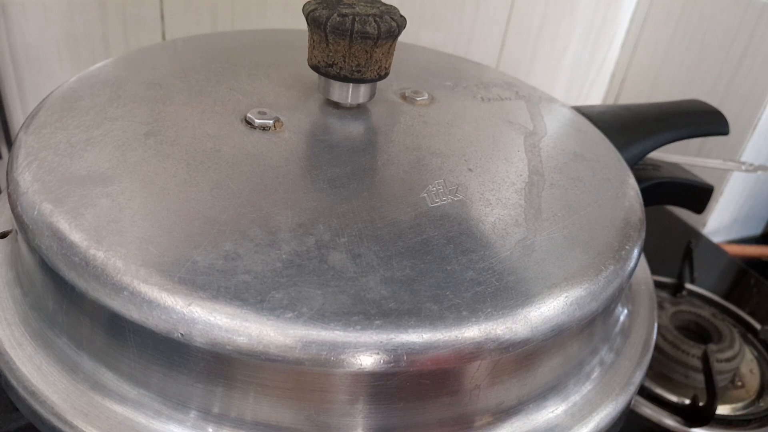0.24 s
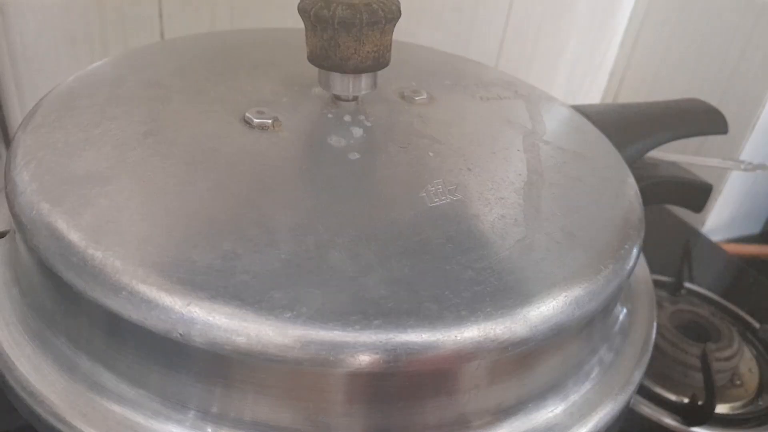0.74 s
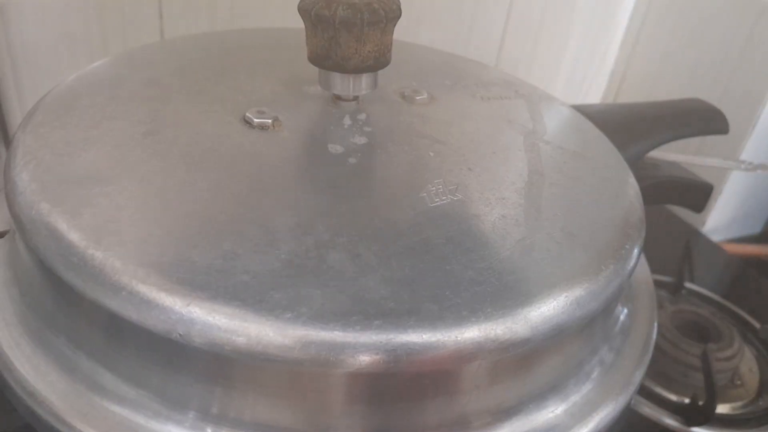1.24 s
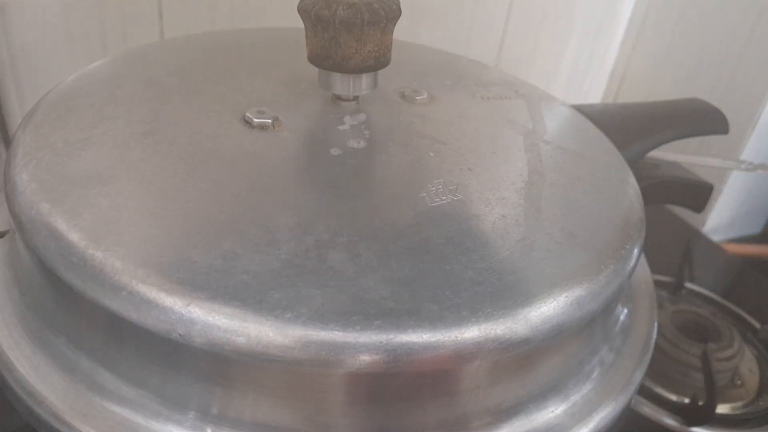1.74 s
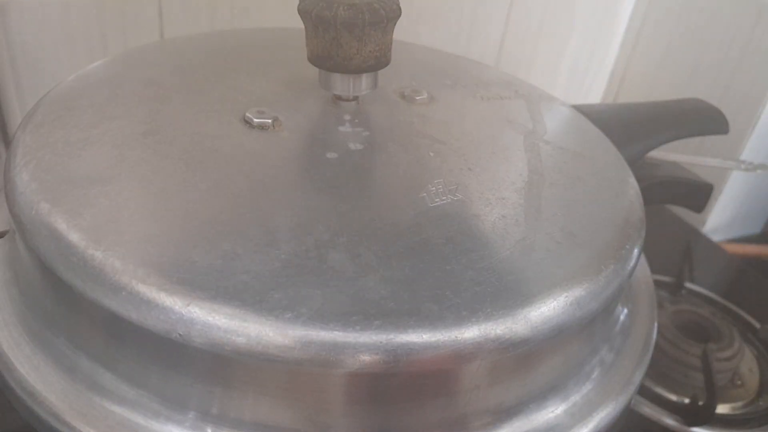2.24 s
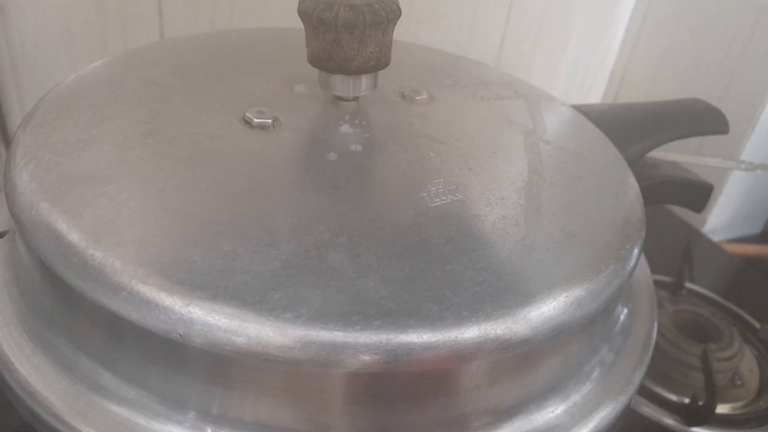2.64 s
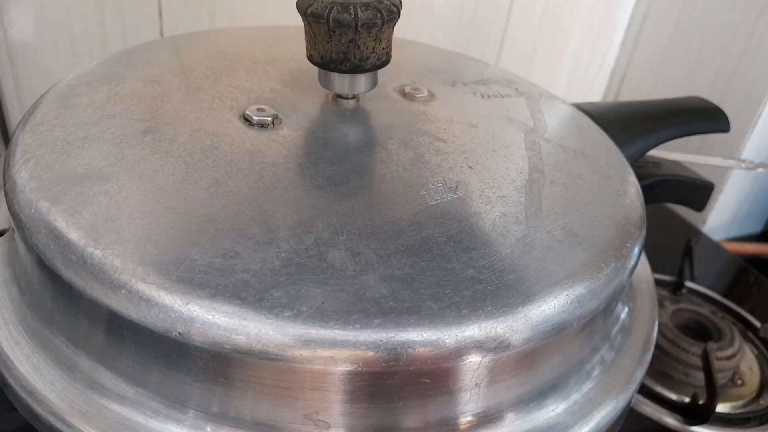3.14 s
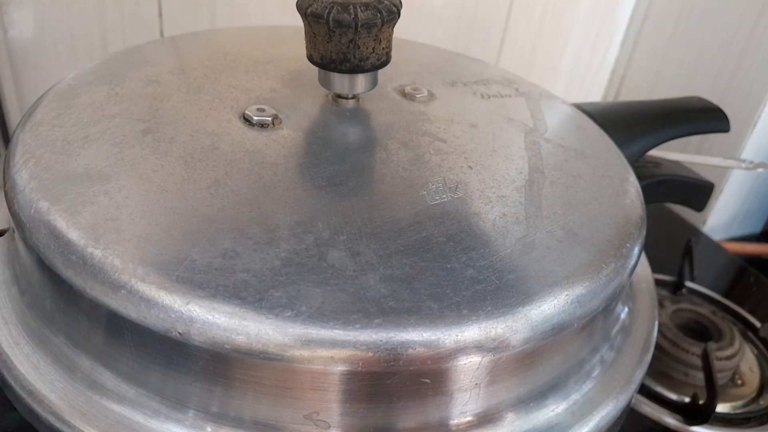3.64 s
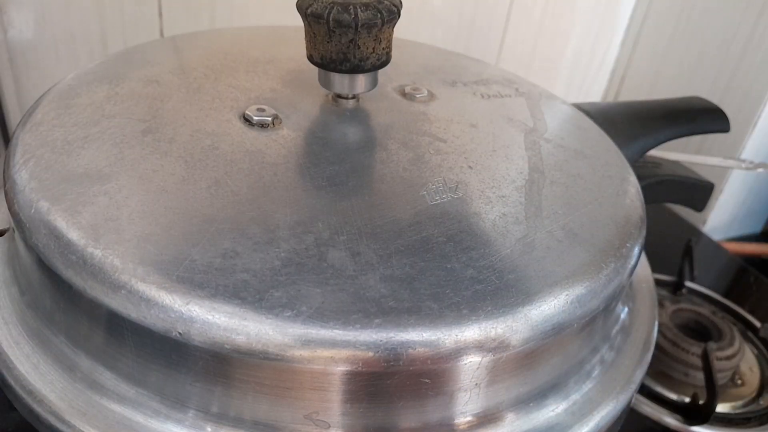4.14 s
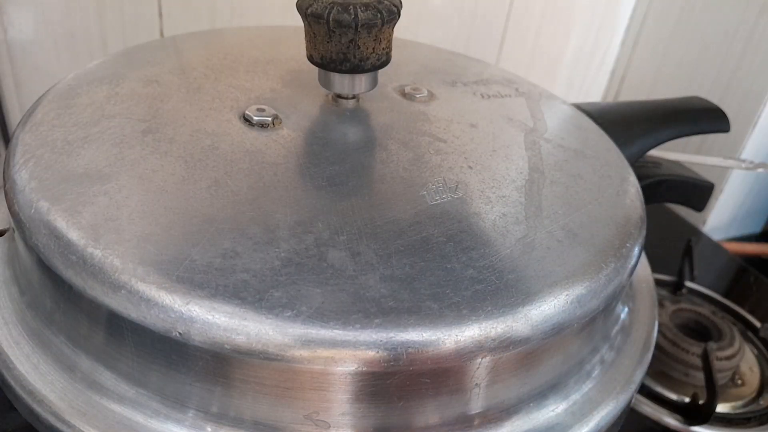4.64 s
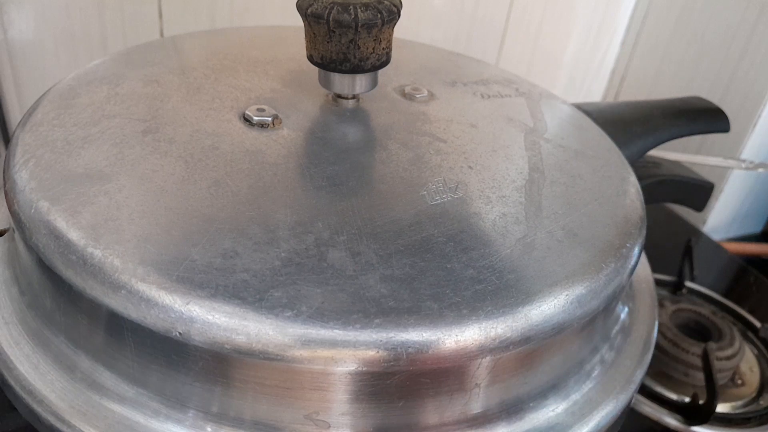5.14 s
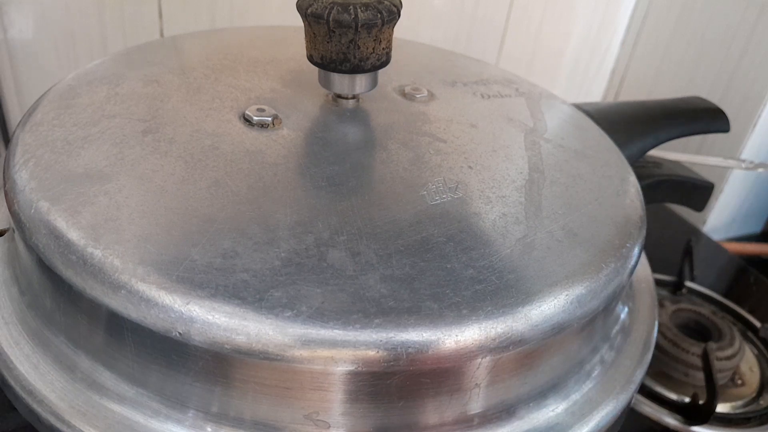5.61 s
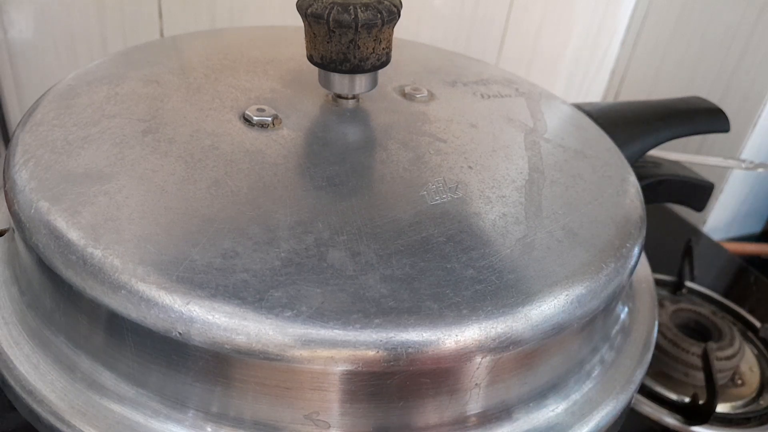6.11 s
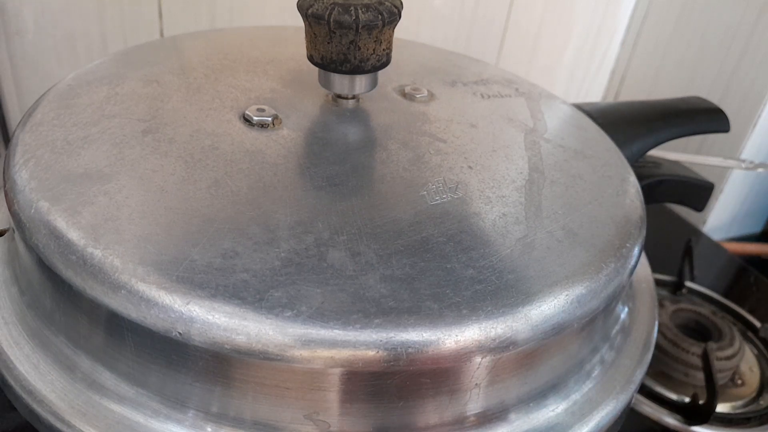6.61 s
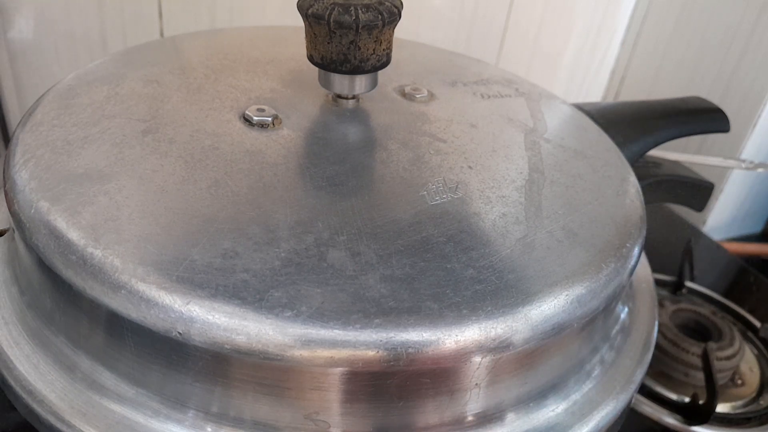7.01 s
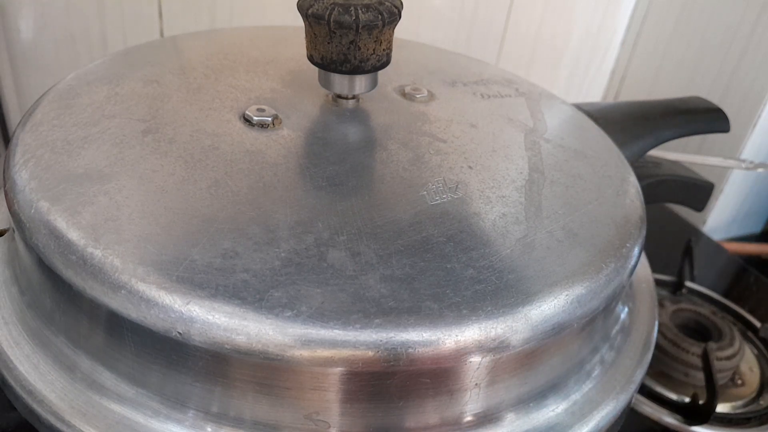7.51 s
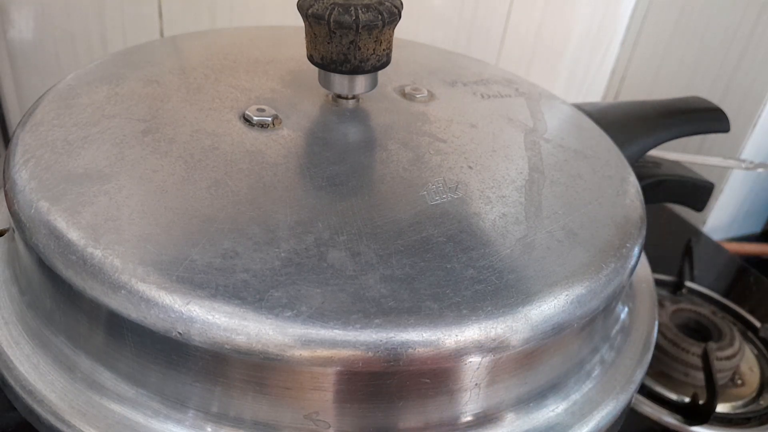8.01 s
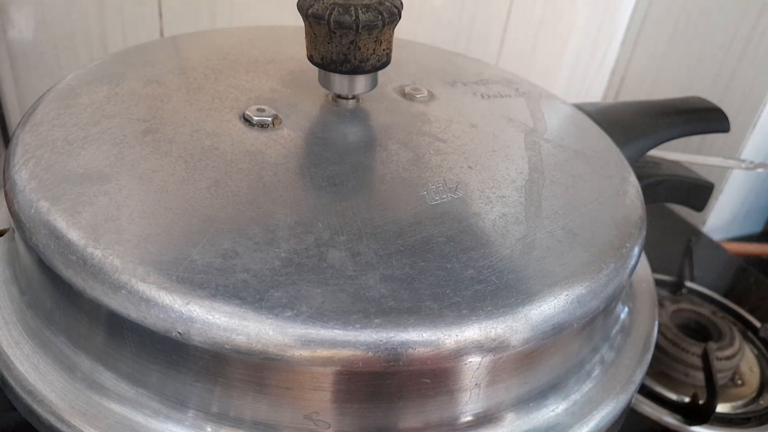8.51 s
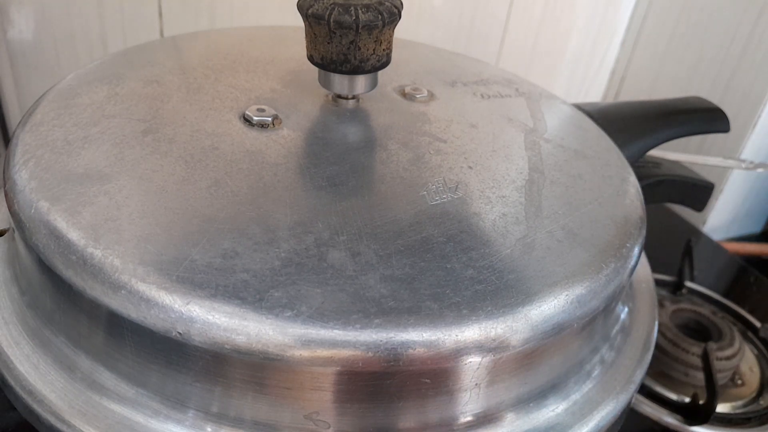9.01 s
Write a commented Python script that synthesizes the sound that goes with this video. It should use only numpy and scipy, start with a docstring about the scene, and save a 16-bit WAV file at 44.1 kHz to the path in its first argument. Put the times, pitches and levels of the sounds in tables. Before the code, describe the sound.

A quiet kitchen with a low rumble and a faint distant tone cuts out for an instant. Then a pressure cooker blasts a loud, bright hiss of steam past its weight valve, close to the microphone. The draught buffets the microphone and the hiss takes on a sweeping, hollow colour. After another brief dropout, the hiss carries on steadily, a little calmer, with two tiny spits.

```python
"""Pressure cooker in a tiled kitchen

A quiet room with a low rumble and a distant tone is heard at two microphone ports. The sound drops out;
then a turbulent jet of steam roars past the weight valve, excites its resonances and buffets the ports,
while the echo off a hand nearing the right port sweeps a comb filter through the hiss.
After a second dropout the jet hisses on, a little calmer, and spits two droplets."""
import sys
import numpy as np
from scipy import signal
from scipy.fft import rfft, irfft, next_fast_len
from scipy.io import wavfile
from scipy.ndimage import uniform_filter1d, map_coordinates

SR = 44100
rng = np.random.default_rng(int(sys.argv[2]) if len(sys.argv) > 2 else 0)


def output_pcm(signal):
    """Save a mono or channel-first signal as 16-bit PCM at the path in sys.argv[1].

    Samples are clipped to [-1, 1] before scaling.
    """
    pcm = np.clip(np.atleast_2d(signal).T, -1, 1) * 32767
    wavfile.write(sys.argv[1], SR, np.round(pcm).astype(np.int16))


N = 408366
TIME = np.arange(N) / SR
STEAM_START_S, SECOND_BURST_S = .65, 3  # each falls inside a dropout
FIRST_BURST = TIME < SECOND_BURST_S


def amp(db):
    """Amplitude ratio of a level in decibels."""
    return 10 ** (np.asarray(db) / 20)


def unit(x):
    """Normalisation of each channel to an rms of 1."""
    return x / np.sqrt(np.mean(x ** 2, axis=-1, keepdims=True))


def ramp(start_s, length_s):
    """Linear rise from 0 to 1."""
    return np.clip((TIME - start_s) / length_s, 0, 1)


def over_frequency(rows, hz):
    """Interpolation of each column after the first on a logarithmic frequency axis."""
    knots_hz, *columns = np.transpose(rows)
    return np.array([np.interp(np.log(hz + 1), np.log(knots_hz + 1), c) for c in columns])


def over_time(rows):
    """Linear interpolation of each column after the first, one value a sample."""
    knots_s, *columns = np.transpose(rows)
    return np.array([np.interp(TIME, knots_s, c) for c in columns])


def wobble(rate):
    """Smooth random modulation: a spline through `rate` Gaussian knots a second."""
    return map_coordinates(rng.standard_normal(int(N * rate / SR) + 4), [TIME * rate])


def filtered(x, response):
    """Linear filtering: the spectrum is multiplied by a complex frequency response."""
    size = next_fast_len(N + 8192)
    return irfft(rfft(x, size) * response(np.fft.rfftfreq(size, 1 / SR)), size)[..., :N]


def port_pair(noises, coherence, left_lead):
    """Partial coherence: independent noises mix as mid and side, then part in phase."""
    angle = lambda hz: np.arccos(np.clip(coherence(hz), 0, 1)) / 2
    mid, side = filtered(noises, lambda hz: np.array([np.cos(angle(hz)), np.sin(angle(hz))]))
    pair = np.array([mid + side, mid - side])
    return filtered(pair, lambda hz: np.exp(.5j * np.outer([1, -1], left_lead(hz))))


# Flicker of the hiss. Each row: frequency in Hz, standard deviation of the gain in dB.
FLICKER_DEPTH = [(1000, 1), (3000, 1.7), (5500, 1.2), (7500, 2), (9500, 3.6), (12000, 2.6), (16000, 3)]

def flickering_noise():
    """Random modulation: two noises flicker together in time and frequency, deepest in the treble."""
    hz, _, spectra = signal.stft(rng.standard_normal((2, N)), SR, nperseg=512)
    patches = uniform_filter1d(rng.standard_normal(spectra.shape[1:]), size=3, axis=0)
    patches = uniform_filter1d(patches, size=8, axis=1)
    gain = amp(over_frequency(FLICKER_DEPTH, hz).T * patches / patches.std())
    return signal.istft(spectra * unit(gain), nperseg=512)[1][:, :N]


# Spectrum of the quiet kitchen. Each row: frequency in Hz, relative level in dB.
ROOM_SPECTRUM = [(20, -20), (55, 1), (100, 0), (125, -11), (242, -15), (296, -9.5), (340, -14), (408, -16),
                 (1090, -19), (1330, -14), (1470, -17), (1750, -16), (2100, -24), (2740, -23), (4000, -21),
                 (5100, -21.5), (6500, -15.5), (8600, -23), (9510, -24), (15700, -22)]
# Room noise at the two ports. Each row: frequency in Hz, coherence from 0 to 1.
ROOM_COHERENCE = [(130, 0.7), (300, 0.86), (640, 0.34), (1500, .05), (6800, .2), (15000, 0.59)]

def room_noise(level_db=-43.5):
    """Ambient noise, strongest and most coherent in the bass."""
    air = port_pair(flickering_noise(), lambda hz: over_frequency(ROOM_COHERENCE, hz)[0], np.zeros_like)
    return amp(level_db) * unit(filtered(air, lambda hz: amp(over_frequency(ROOM_SPECTRUM, hz))))


# Chance swells of the low rumble. Each row: time in seconds, rms level in dB averaged over the ports.
RUMBLE_SWELLS = [(0.0, -34), (0.066, -46), (0.116, -31), (0.136, -53), (0.162, -33), (0.202, -61),
                 (0.264, -41), (0.298, -57), (0.37, -39), (0.404, -62), (0.43, -45), (0.472, -37),
                 (0.516, -50), (0.536, -46), (0.56, -46)]
# Pitch wander of the low rumble. Each row: time in seconds, frequency in Hz.
RUMBLE_WANDER = [(0, 84), (.11, 82), (.15, 95), (.36, 94.3), (.43, 87.7), (.57, 74)]

def room_rumble():
    """A narrow-band rumble near 80 Hz, formed as a carrier with irregular swells and wandering pitch."""
    level_db = uniform_filter1d(over_time(RUMBLE_SWELLS)[0], size=SR // 90)
    hz = over_time(RUMBLE_WANDER)[0] + 2 * wobble(20)
    wave = np.sqrt(2) * np.sin(2 * np.pi * np.cumsum(hz) / SR)
    return amp(level_db) * wave * amp([[1.2], [-1.2]])


def distant_whistle(stop_s=.12, drop_s=.3, drop_hz=74.4, sink_hz_per_s=150, afterglow_t60_s=1.2):
    """A tone swells and stops; its afterglow decays exponentially, steps down in pitch, then sinks."""
    stopped = ramp(stop_s, .03)
    hz = 1385 - 12 * stopped - drop_hz * ramp(drop_s, .027)
    hz -= sink_hz_per_s * np.maximum(TIME - drop_s, 0)
    held = amp(-39.5 + 2.5 * ramp(0, .09)) * (1 - stopped)
    afterglow = amp(-44.5 - 60 * (TIME - stop_s) / afterglow_t60_s) * ramp(stop_s, .12)
    flicker = amp([1.3 * wobble(40), 1.2 * wobble(40) - 4])
    phase = 2 * np.pi * np.cumsum(hz) / SR
    return (held + afterglow) * flicker * np.sin(phase + [[0], [1.5]])


def faint_whine(hz=1695):
    """A single spectral line under random amplitude modulation."""
    return amp(-74 + 4 * wobble(30)) * np.sin(2 * np.pi * hz * TIME)


def rumble_under_steam(centre_hz=80, width_hz=28):
    """Narrow-band noise, coherent at both ports, carries the room's rumble on."""
    band = filtered(rng.standard_normal(N), lambda hz: np.exp(-((hz - centre_hz) / width_hz) ** 2))
    return amp([[-53], [-55]]) * unit(band)


# Spectrum of the buffeting. Each row: frequency in Hz, relative level in dB.
BUFFET_SPECTRUM = [(20, -32), (40, -8), (70, 0), (200, -4.5), (600, -7.5), (1300, -13.5), (2500, -17),
                   (6000, -18)]
# Draught as each burst of steam begins. Each row: left level in dB, right level in dB.
DRAUGHT_LEVELS = [(-38, -37), (-36, -39)]
# Gusts on the right port. Each row: start in seconds, length in seconds, right and left gain in dB.
PORT_GUSTS = [(1.977, 0.071, 9, 0), (2.257, 0.62, 13, -5.5)]

def draught(sag_db_per_s=.68, gust_edge_s=.12, left_edge_s=.32, gust_sag_db_per_s=.3):
    """Eddies thump each port independently; gusts rise, ease and fall, and the second burst sags."""
    first_db, second_db = np.array(DRAUGHT_LEVELS)[:, :, None]
    level_db = np.where(FIRST_BURST, first_db, second_db - sag_db_per_s * (TIME - SECOND_BURST_S))
    for start, length, right_db, left_db in PORT_GUSTS:
        left = left_db * ramp(start, min(length, left_edge_s))
        right = right_db * ramp(start, gust_edge_s)
        right -= gust_sag_db_per_s * np.maximum(TIME - start - .25, 0)
        release = (1 - ramp(start + length, gust_edge_s)) * FIRST_BURST
        level_db += release * np.array([left, right])
    lumps = amp([.36 * wobble(15) + 2.73 * wobble(250) for port in "LR"])
    eddies = lumps * rng.standard_normal((2, N))
    buffeting = filtered(eddies, lambda hz: amp(over_frequency(BUFFET_SPECTRUM, hz)))
    return amp(level_db) * unit(buffeting)


def tile_reverberation(x, level_db=-18, t60_s=.08):
    """Dense, exponentially decaying reflections add a fine, steady ripple to each port's spectrum."""
    t = np.arange(SR // 8) / SR
    tail = rng.standard_normal((2, len(t))) * amp(-60 * t / t60_s) * (t > .003)
    tail /= np.linalg.norm(tail, axis=1, keepdims=True)
    return x + amp(level_db) * signal.fftconvolve(x, tail, axes=1)[:, :N]


# Echoes off tiles and lid. Each row: delay in milliseconds, left and right gain in dB.
NEAR_ECHOES = [(1.08, -26, -28), (2.0, -29, -25), (3.7, -23, -32), (4.84, -28, -32)]

def early_reflections(x, cutoff_hz=9000):
    """Interference with weak, dull, delayed copies ripples the spectrum."""
    delay_ms, *gain_db = np.transpose(NEAR_ECHOES)
    echoes = lambda hz: amp(gain_db) @ np.exp(-2j * np.pi * np.outer(delay_ms / 1000, hz))
    return filtered(x, lambda hz: 1 + echoes(hz) / (1 + (hz / cutoff_hz) ** 4))


# The hand nearing the right port. Each row: time in seconds, extra path of its echo in centimetres.
HAND_DETOUR = [(1.7, 14.5), (1.9, 10.3), (2.05, 9.86), (2.4, 6.54), (2.6, 5.9), (2.93, 5.6)]

def hand(direct, reach_cm=12.4, shade_db=2.5, treble_far_db=-6, treble_near_db=3):
    """Comb filtering: the teeth rise as the echo path shortens; the palm shades but gathers treble."""
    detour_cm, = over_time(HAND_DETOUR)
    closeness = 1 / detour_cm
    nearness = (closeness - closeness.min()) / np.ptp(closeness)
    # The small, soft reflector shifts the phase and scatters the extremes of the spectrum.
    reflection_hz_db = [(2000, -2), (7000, 0), (12500, .5), (15000, -3)]
    reflected = filtered(direct, lambda hz: np.exp(1.5j) * amp(over_frequency(reflection_hz_db, hz)[0]))
    delay_s = detour_cm / 34300  # speed of sound in cm/s
    echo = map_coordinates(reflected, [np.arange(N) - delay_s * SR], mode="nearest")
    strength = np.clip(1.6 * (reach_cm / detour_cm - 1), .15, .6)
    combed = direct + FIRST_BURST * strength * echo
    treble = filtered(combed, lambda hz: 1 / (1 + (7000 / (hz + 1)) ** 4))
    treble_db = treble_far_db + (treble_near_db - treble_far_db) * nearness
    cupped = combed + (amp(treble_db) - 1) * treble
    return np.where(FIRST_BURST, amp(-shade_db * nearness) * cupped, direct)


# Spat droplets. Each row: time in seconds, level in dB, centre in Hz, width in natural log frequency.
DROPLETS = [(3.15, -29, 4430, 0.21), (4.5, -29, 2740, 0.31)]

def droplets(half_length_s=.02):
    """A droplet in the valve gap makes a puff: band-limited noise in a Gaussian envelope."""
    puffs = np.zeros(N)
    for peak_s, level_db, centre_hz, width in DROPLETS:
        passband = lambda hz: np.exp(-(np.log((hz + 1) / centre_hz) / width) ** 2)
        band = unit(filtered(rng.standard_normal(N), passband))
        puffs += amp(level_db) * band * np.exp(-((TIME - peak_s) / half_length_s) ** 2)
    return puffs


# Broad spectrum of the jet. Each row: frequency in Hz, then spectral levels in dB, before the flow's
# gain, for strong flow left and right and for calm flow left and right.
JET_SPECTRUM = [(300, -100, -87.5, -77, -89), (1300, -68, -83, -73.5, -79.5),
                (2060, -64.5, -70.5, -68.5, -71.5), (2940, -55.5, -64, -66.5, -66),
                (4060, -53, -59.5, -57, -56), (5800, -55, -62.5, -55.5, -56),
                (6760, -55.5, -55, -58, -58.5), (7580, -54.5, -55.5, -52.5, -54.5),
                (8250, -62, -69, -56, -60), (8800, -59, -70, -62, -75.5), (9260, -70, -66, -62.5, -63),
                (10040, -71.5, -72, -70.5, -66.5), (11200, -64, -58, -70, -66.5),
                (12670, -57, -55.5, -61, -54.5), (13800, -58.5, -54, -61.5, -61),
                (15700, -57, -55, -61, -60)]
# Resonances and dips of lid, weight and ports. Each row: centre in Hz, width in Hz, then gains in dB
# for strong flow left and right and for calm flow left and right.
RESONANCES = [(1624, 100, 4.5, 8, -2.5, 0), (1835, 58, 1, -5.5, -1.5, -6), (2246, 60, 7.5, 6, -1, 2),
              (2450, 68, 0.5, -3, 0, 5), (2650, 43, -3, -3.5, 3, 1), (2970, 45, 1.5, 10, 7.5, 3),
              (3400, 51, -2.5, 1, 2.5, 1), (3420, 63, 6, 0.5, 3, 6), (3770, 80, 0.5, 7, -3.5, -7),
              (3855, 76, -0.5, -5, 6, 4), (4120, 67, 3, -5, -4, -3), (4153, 44, -3, 5, 2.5, 8),
              (4600, 83, 1.5, 2, 1.5, 1), (4820, 100, 2, 3, 2, 1), (4950, 70, 1, -4, 1, 5),
              (6430, 130, 0, -8.5, 4, 0.5), (6740, 99, 2, -2, 2.5, 5), (6900, 210, 6, 6, 1, 1),
              (7220, 100, -2.5, -3, 3.5, 1.5), (7520, 260, 3.5, 3.5, 1.5, 1.5),
              (8150, 160, 7.5, 6.5, 1, -1), (12400, 330, 4, 1, -2.5, -4)]

def jet_colour(hz, frame_s, pitch_drift=.0025, depth_drift=.12, drift_rate=9):
    """Resonance: narrow Lorentzian peaks and dips, drifting in pitch and depth, lie on a broad shape."""
    centre_hz, width_hz, *peak_db = np.transpose(RESONANCES)
    offset = 2 * (hz - centre_hz[:, None]) / width_hz[:, None]
    narrow_db = np.array(peak_db) @ (1 / (1 + offset ** 2))
    frames = np.minimum(frame_s * SR, N - 1).astype(int)
    drifted_hz = np.outer(hz, 1 + pitch_drift * wobble(drift_rate)[frames])
    depth = 1 + depth_drift * wobble(drift_rate)[frames]
    drifted_db = np.array([np.interp(drifted_hz, hz, curve) for curve in narrow_db])
    return amp(over_frequency(JET_SPECTRUM, hz)[..., None] + depth * drifted_db)


# Stereo width and phase of the hiss. Each row: frequency in Hz, coherence 0 to 1, left lead in radians.
HISS_STEREO = [(200, 0.6, .1), (2020, 0.34, 1.45), (4400, 0.64, 2.89), (5990, 0.84, 4.54),
               (8140, 0.07, 7.6), (8910, 0.96, 8.3), (10800, 0.87, 13.1), (13450, 0.72, 11.1),
               (15600, 0.06, 16)]
# Flow of steam. Each row: time in seconds, gain in dB, share of the strong-flow spectrum from 0 to 1.
STEAM_FLOW = [(.7, 0.2, 0.6), (1.05, -0.54, 0.66), (1.9, -1, 0.7), (2.25, -0.5, 0.77), (2.45, -0.9, 0.56),
              (2.65, -2, 0.55), (2.93, -2.5, 0.5), (3.07, .5, 0.12), (3.6, -1.26, 0.16), (5.9, 0, 0),
              (7, -1.4, 0.12), (8, -1, 0.09), (8.5, -0.5, 0.12), (9.26, -1.5, 0.14)]

def steam_jet(first_right_db=3.5, second_right_db=-1.5):
    """Turbulent jet noise from the valve gap; the weight rocks, so the flow flutters."""
    flutter = amp(.3 * wobble(9) + .3 * wobble(20) + .9 * wobble(300))
    coherence = lambda hz: over_frequency(HISS_STEREO, hz)[0]
    left_lead = lambda hz: over_frequency(HISS_STEREO, hz)[1]
    hiss = port_pair(flutter * flickering_noise(), coherence, left_lead)
    hz, frame_s, spectra = signal.stft(hiss, SR, nperseg=2048)
    gain = np.sqrt(SR / 2) * jet_colour(hz, frame_s)  # white noise spreads its power over SR / 2
    strong, calm = signal.istft(spectra * gain.reshape(2, *spectra.shape), nperseg=2048)[1][..., :N]
    flow_db, strong_share = over_time(STEAM_FLOW)
    right_db = np.where(FIRST_BURST, first_right_db, second_right_db)
    return amp([flow_db, flow_db + right_db]) * (strong_share * strong + (1 - strong_share) * calm)


def scene():
    """Superposition: the quiet room first, then the steam with its reflections, draught and rumble."""
    steam = tile_reverberation(early_reflections(steam_jet() + droplets()))
    steam[1] = hand(steam[1])
    room = room_noise() + room_rumble() + distant_whistle() + faint_whine()
    return np.where(TIME < STEAM_START_S, room, steam + draught() + rumble_under_steam())


# Audible spans around the two dropouts. Each row: start in seconds, end in seconds.
AUDIBLE_SPANS = [(0, .5645), (.7045, 2.9325), (3.0724, 9.3)]

def record(dry, ceiling=.95, step_db=-17, tail_db_per_s=3200, cutoff_hz=15730):
    """Soft saturation, a gate that steps down to a faint tail and reopens abruptly, then a low-pass."""
    saturated = dry / (1 + np.abs(dry / ceiling) ** 6) ** (1 / 6)
    gate = np.zeros(N)
    for start, end in AUDIBLE_SPANS:
        tail = amp(step_db - tail_db_per_s * np.abs(TIME - end))
        gate += (TIME >= start) * np.where(TIME < end, 1, tail)
    gate = uniform_filter1d(gate, size=15)
    return filtered(gate * saturated, lambda hz: (1 - np.tanh((hz - cutoff_hz) / 70)) / 2)


dry = scene()
out = record(dry)
output_pcm(out)
```